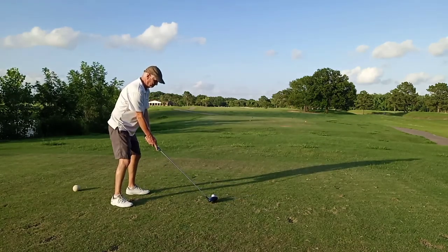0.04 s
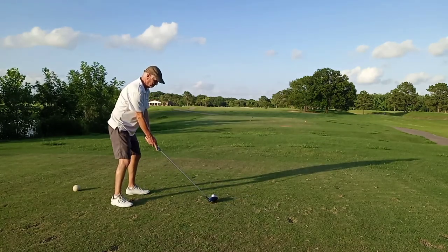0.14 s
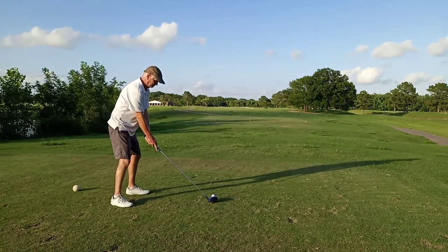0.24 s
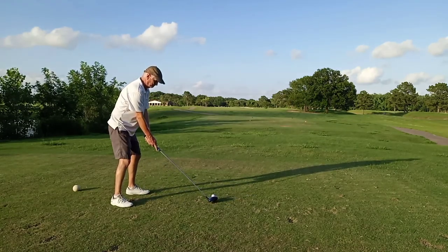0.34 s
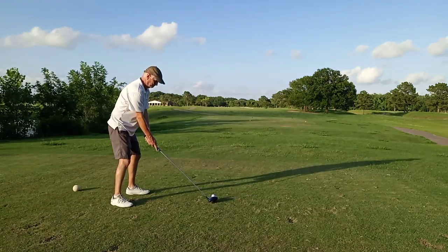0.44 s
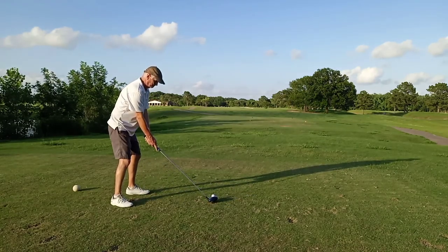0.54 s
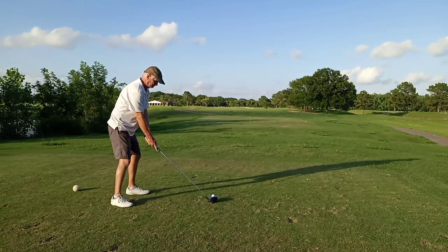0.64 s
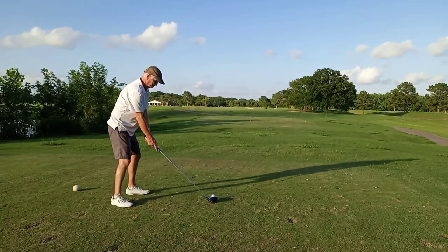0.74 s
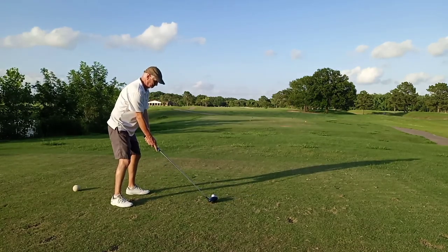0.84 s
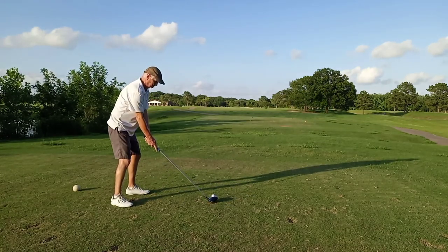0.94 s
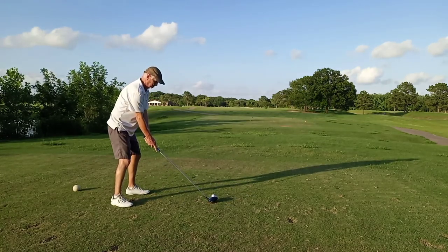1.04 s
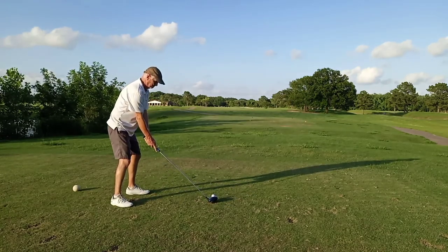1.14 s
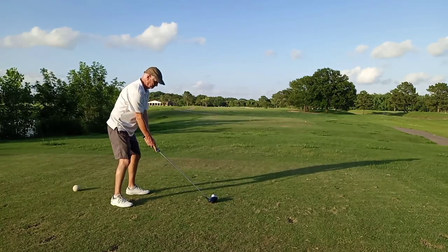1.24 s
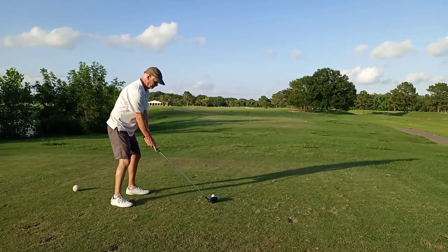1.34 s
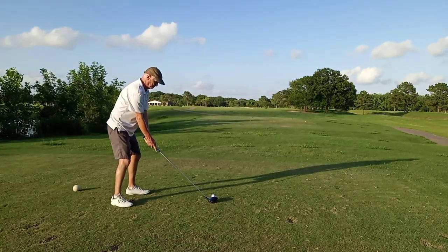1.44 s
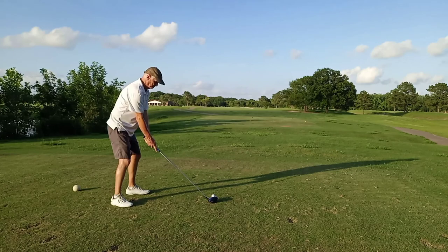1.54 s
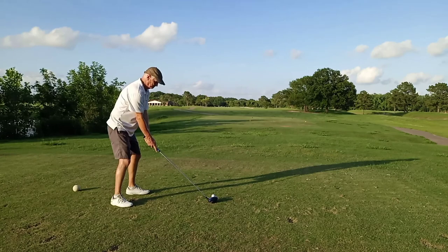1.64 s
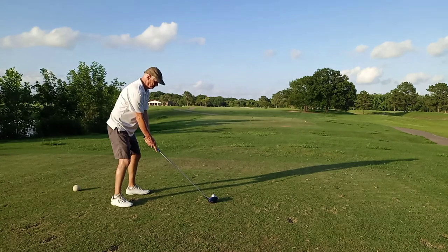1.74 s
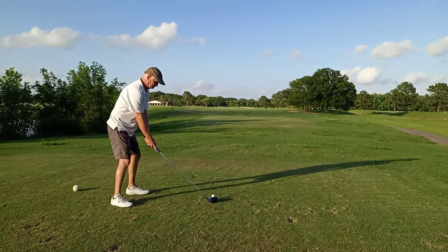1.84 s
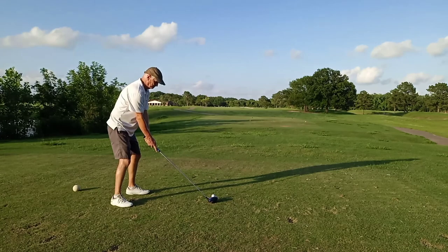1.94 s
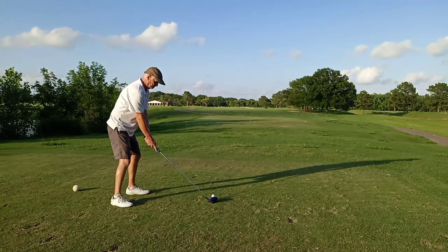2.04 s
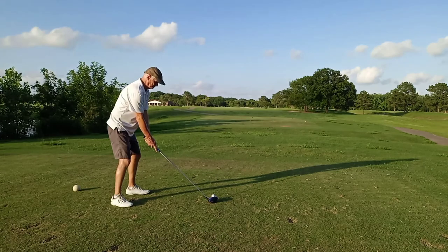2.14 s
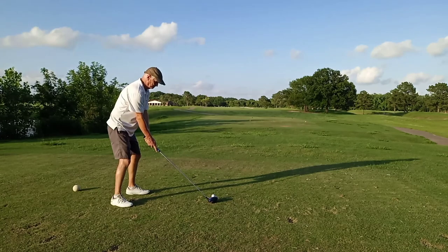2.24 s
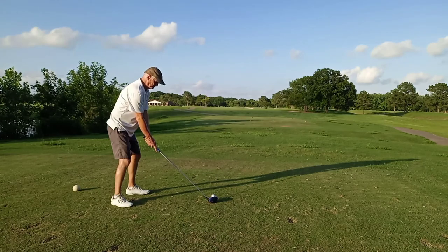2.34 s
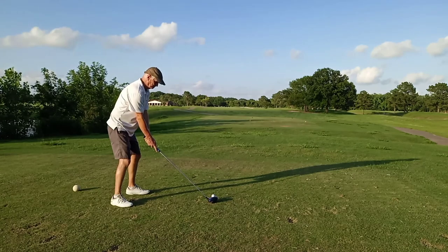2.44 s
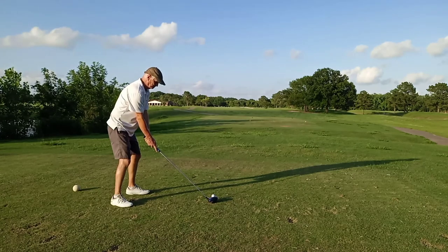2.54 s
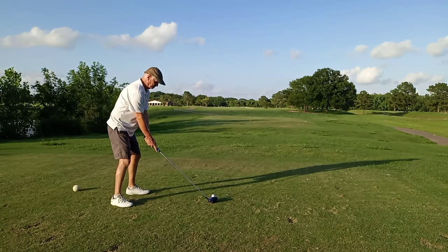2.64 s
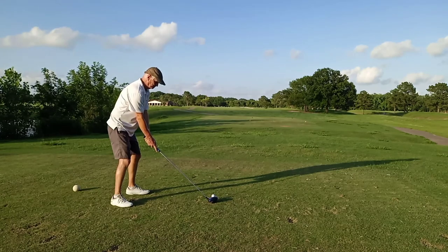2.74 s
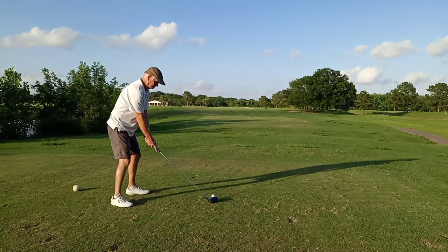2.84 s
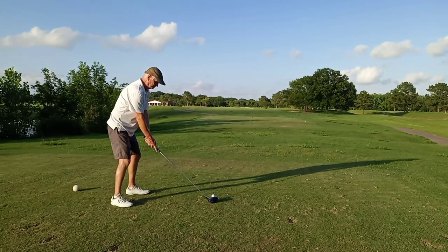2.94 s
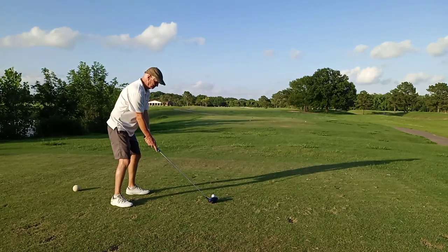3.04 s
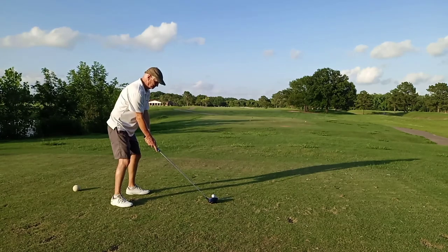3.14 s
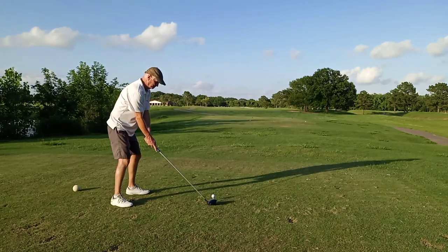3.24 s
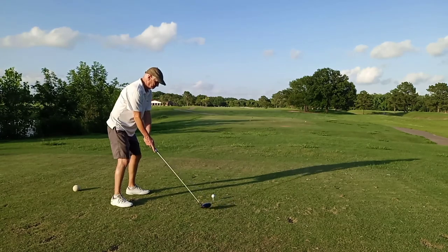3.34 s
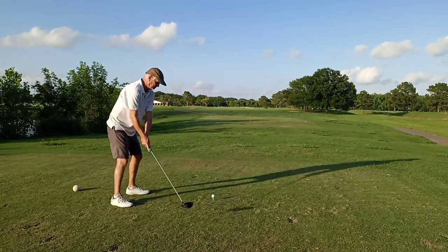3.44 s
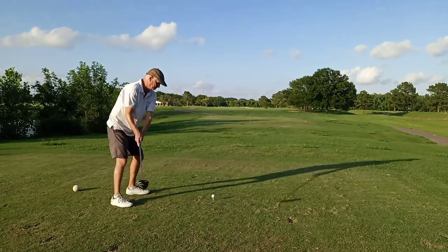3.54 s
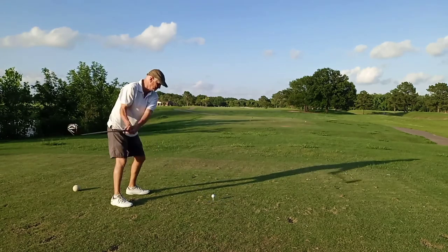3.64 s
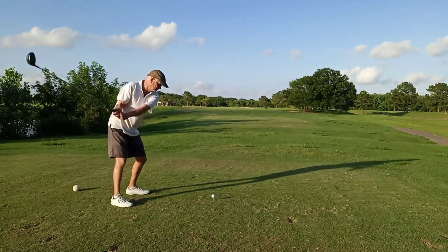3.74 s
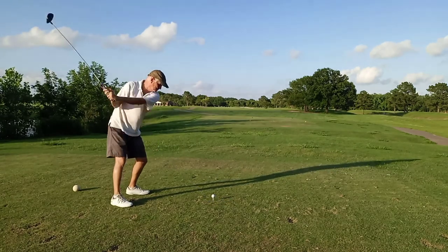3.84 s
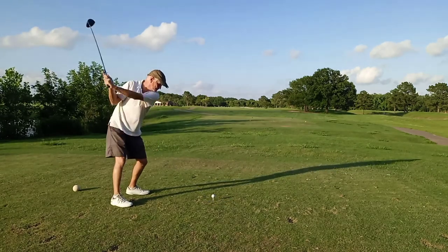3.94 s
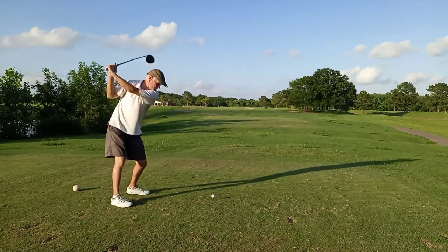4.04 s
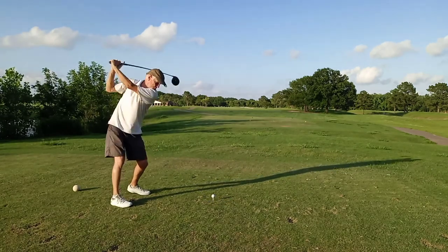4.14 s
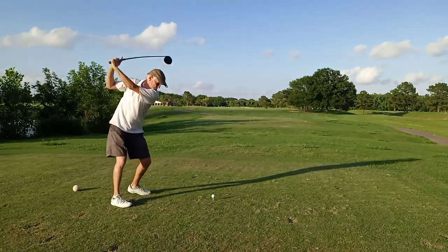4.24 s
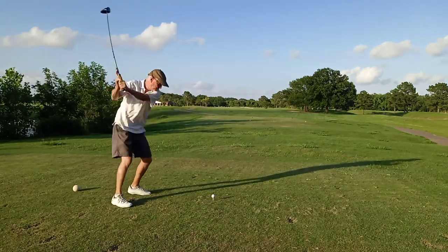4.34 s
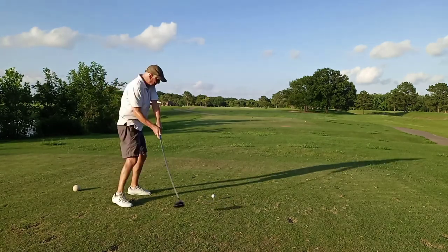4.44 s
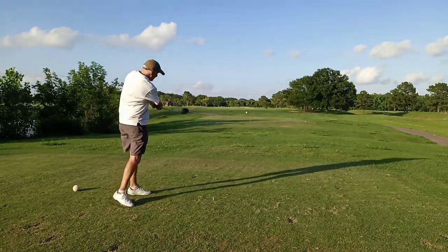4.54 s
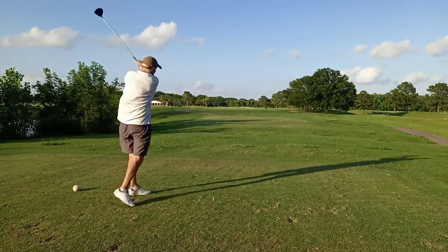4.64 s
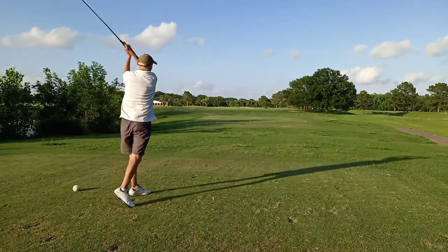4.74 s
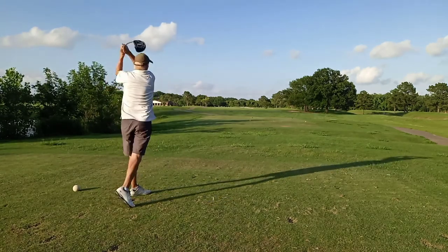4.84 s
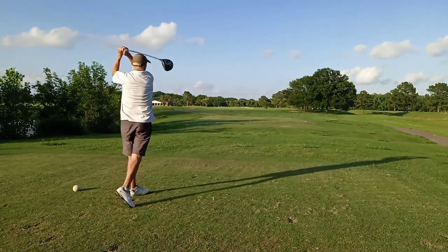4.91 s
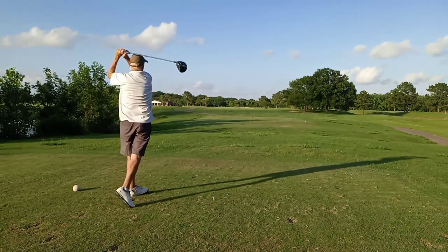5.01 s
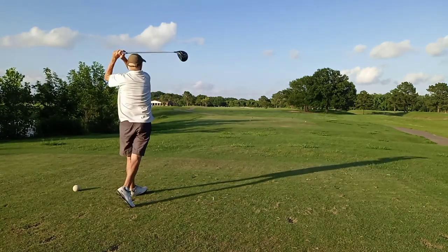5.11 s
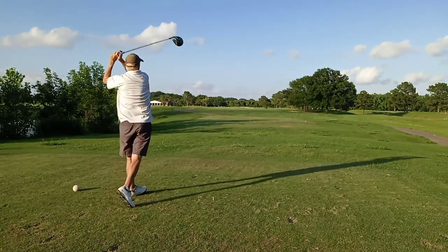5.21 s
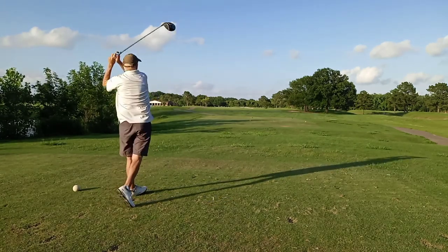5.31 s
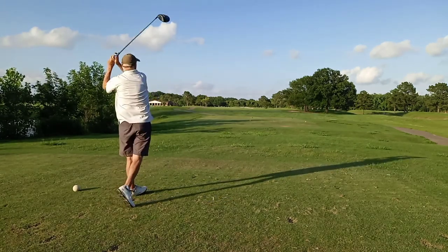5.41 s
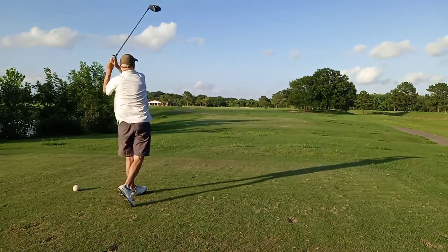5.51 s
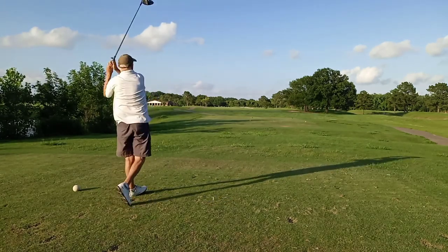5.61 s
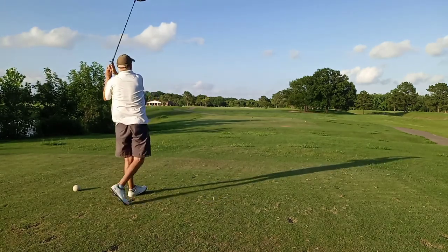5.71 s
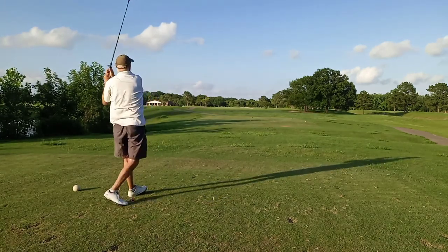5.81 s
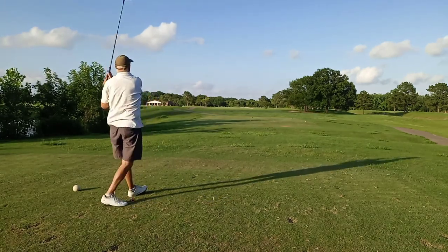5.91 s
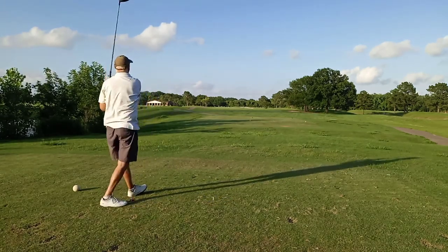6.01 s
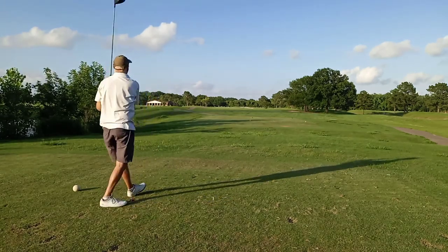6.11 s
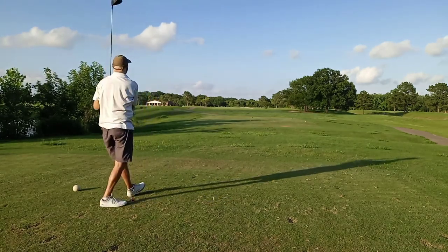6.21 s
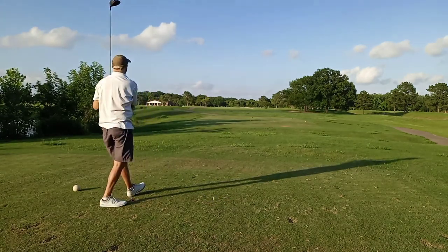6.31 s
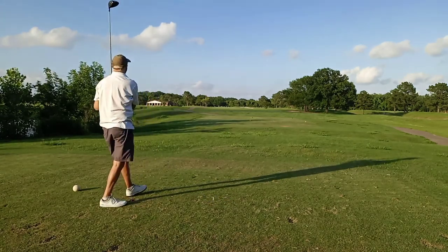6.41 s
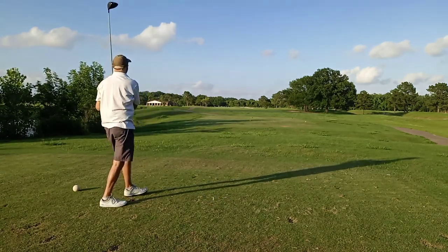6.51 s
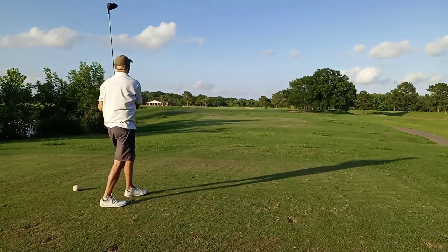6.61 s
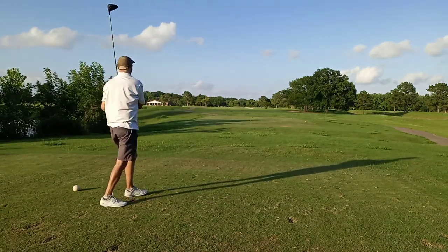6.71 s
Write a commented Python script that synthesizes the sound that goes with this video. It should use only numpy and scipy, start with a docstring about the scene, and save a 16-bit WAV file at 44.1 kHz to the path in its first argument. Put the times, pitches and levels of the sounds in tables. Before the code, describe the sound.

On an open golf course, a wren repeats a quick chirping phrase over a buzzing cicada and a low rumble of distant engines. The bird pauses. Then a nearby club swishes and strikes the ball with a loud, sharp metallic crack that echoes briefly off trees. The wren starts again, with a fainter bird behind it, and the golfer's shoes and clothes brush softly.

```python
"""A golf drive off an open tee: the shaft sheds eddies and swishes, the hollow metal head cracks and
rings, and a stand of trees throws the ring back. Club, tee and shoes tick and brush.
A wren repeats one quick phrase through the leaves, a second bird slurs downward, a third chips.
A cicada buzzes with its clicking ribs, a katydid throbs, and far engines rumble under it all."""
import sys
import numpy as np
from scipy import signal
from scipy.fft import rfft, irfft
from scipy.io import wavfile
from scipy.ndimage import uniform_filter1d

SR = 44100
rng = np.random.default_rng(int(sys.argv[2]) if len(sys.argv) > 2 else 0)


def store_wav(level_fs):
    """Save 16-bit WAV to argv[1]."""
    pcm = np.round(np.clip(np.atleast_2d(level_fs), -1, 1) * 32767)
    wavfile.write(sys.argv[1], SR, pcm.T.astype(np.int16))


N = 298303
T = np.arange(N) / SR

# pressure pulse spectrum: (frequency [Hz], relative level [dB])
BLOW_SPECTRUM = [(20, -33), (50, -11), (90, .5), (250, 2.5), (550, 0), (800, -5), (1020, -29), (1300, -17),
                 (1550, -22), (1900, -12.5), (2600, -21), (4000, -20.5), (6000, -17), (8000, -26.5)]
# club head modes: (frequency [Hz], relative level [dB], t60 [s])
HEAD_MODES = [(3428, -2, .115), (3640, -19, .07), (4388, -9, .075), (4603, -18, .1), (5150, -8, .11),
              (5205, 0, .17), (5385, -15, .09), (5510, -13, .13), (5600, -10, .05), (5985, -12, .12),
              (6260, -17, .16), (6712, -14, .08), (6940, -16, .07), (7250, -12, .08), (7520, -22, .09)]
# light touch on metal: (frequency [Hz], level [dB], t60 [s])
CLINK_MODES = [(4820, -64, .1), (5517, -66, .1), (7265, -65, .14)]
# club, tee, shoes: (time [s], level [dB], centre [Hz], width [Hz], t60 [s])
HANDLING_TICKS = [(3.389, -64, 6500, 3500, 0.045), (4.035, -70, 5000, 4000, 0.026),
                  (4.611, -47, 2000, 1300, 0.019), (5.2347, -55.5, 5600, 2500, 0.02),
                  (5.597, -57, 2500, 3500, 0.065), (5.623, -63, 2500, 3500, 0.057)]
# shoes, clothes: (time [s], length [s], level [dB], centre [Hz], width [Hz])
HANDLING_SCUFFS = [(2.79, .15, -81, 6700, 1400), (5.55, .13, -70, 860, 2500), (5.58, .1, -72, 6100, 1500),
                   (6.43, .17, -68, 695, 1000), (6.43, .19, -74, 6700, 1400)]
# wren phrases: (start [s], span to last syllable [s], level [dB], top pitch [Hz])
WREN_PHRASES = [(-.028, .192, -49, 5150), (.238, 0.17, -47, 4820), (0.484, 0.18, -45, 5140),
                (.734, 0.19, -44.5, 5380), (1.005, 0.18, -45, 4590), (1.271, 0.18, -46.5, 5000),
                (1.544, .19, -46.5, 5020), (4.628, .195, -54.5, 4940), (4.892, .196, -49, 4690),
                (5.157, .19, -46.5, 4627), (5.417, .182, -46, 4920), (5.667, .19, -46, 5090),
                (5.928, 0.2, -45.5, 4230), (6.196, 0.19, -47, 5084), (6.46, .19, -47.5, 4985)]
# rise, hold, flick, plunge, low rise, fall: (place in span [0-1], length [s], start pitch [Hz],
# turn pitch [Hz], end pitch [Hz], place of turn [0-1], top pitch tracking [0-1], relative level [dB])
WREN_SYLLABLES = [(0, 0.0302, 2655, 3149, 3344, .42, .05, 2.5),
                  (0.354, 0.039, 4007, 4142, 4244, .35, .35, -5.5),
                  (0.524, 0.019, 4180, 5127, 4710, 0.8, .95, -9),
                  (0.624, .021, 4484, 3438, 2903, 0.4, .15, -1.5),
                  (.742, .036, 2165, 2483, 2592, .45, .05, -3.5),
                  (.995, .03, 2950, 2872, 2585, 0.4, .05, -0.5)]
# second bird: (time [s], top pitch [Hz], relative level [dB], length [s])
BIRD_SLURS = [(0.229, 2047, -66.5, 0.08), (4.162, 2360, -75.5, 0.25), (4.869, 2455, -65, 0.2),
              (5.344, 2250, -65, 0.096), (5.747, 2175, -65, 0.11), (6.164, 2144, -66, 0.12),
              (6.58, 2185, -64, 0.11)]
# third bird: (time [s], pitch [Hz], relative level [dB])
BIRD_CHIPS = [(.925, 7410, -71), (4.24, 7160, -69)]
# cicada band: (frequency [Hz], relative level [dB])
CICADA_SPECTRUM = [(2300, -42), (2650, -23.5), (2950, -2.5), (3250, 0), (3600, -4), (3900, -19),
                   (4500, -48.5)]
# cicada effort: (time [s], level [dB], click rate [Hz])
CICADA_CURVE = [(0, -58.5, 205), (1, -62.5, 208), (2.2, -60.5, 213), (3, -66, 205), (3.45, -63.5, 199),
                (3.8, -72.5, 207), (4.2, -76.5, 205), (4.6, -68.5, 203), (6.76, -62, 205)]
# far engines: (frequency [Hz], relative level [dB])
RUMBLE_SPECTRUM = [(20, -32.5), (38, -20.5), (52, -12.5), (66, 1), (85, -2), (120, 2), (160, -4.5),
                   (200, -8), (250, -16), (330, -19.5), (450, -33.5), (700, -64)]
# rumble loudness: (time [s], level [dB])
RUMBLE_CURVE = [(0, -52), (.8, -55), (1.25, -52.5), (2.8, -56), (3.05, -52), (4.3, -54), (5.05, -51),
                (5.95, -50.5), (6.76, -52.5)]
# wash of air: (frequency [Hz], relative level [dB])
AIR_SPECTRUM = [(200, -17), (400, -6.5), (650, 2), (860, 0.5), (1100, -4), (1550, -6), (1900, -12),
                (2600, -12.5), (4200, -15.5), (5500, -18), (7300, -19.5), (8200, -40.5)]

IMPACT_S = 4.569
WREN_TOP_HZ = 5043


def drive():
    """Club hits ball. The head rushes at the trees ahead, so their echo is pitched above the side's."""
    t = np.arange(SR // 2) / SR
    direct, ahead, aside = np.zeros((3, N))
    contact = gain_of(-19.5 - 60 * t / .0069) * band(2900, 4500, len(t))
    doppler = 1 + np.clip((t - .018) * .92, 0, .07)  # head swings toward the listener
    add(direct, IMPACT_S, contact)
    add(direct, IMPACT_S + .0005, blow())
    add(direct, IMPACT_S, head_ring(doppler))
    crack = noise([(500, -7.5), (1600, -5.5), (2900, -11), (4600, 4.5), (6500, 7.5), (8300, -22)], len(t))
    crack *= gain_of(-5 - 60 * t / .029)
    add(ahead, IMPACT_S, spread_ring(1.05, 1.1, len(t)) + crack)
    add(aside, IMPACT_S, spread_ring(1, 1.08, len(t)) + crack)
    return direct + gain_of(-19.5) * tree_echo(ahead, aside)


def blow(size=4096, peak_db=-2):
    """Ball squashed and released: one minimum-phase pressure pulse."""
    log_gain = np.log(gain_at(BLOW_SPECTRUM, abs(np.fft.fftfreq(size, 1 / SR))))
    pulse = np.fft.ifft(np.exp(np.conj(signal.hilbert(log_gain)))).real
    return -gain_of(peak_db) * pulse / abs(pulse).max()


def head_ring(doppler):
    """Hollow head: Doppler-shifted main modes plus a dense clatter of short ones."""
    t = np.arange(len(doppler)) / SR
    warped_s = np.cumsum(doppler) / SR
    modes = sum(gain_of(db - 60 * t / t60_s) * np.sin(2 * np.pi * (hz * warped_s + rng.random()))
                for hz, db, t60_s in HEAD_MODES)
    clatter = noise([(1000, -29), (2400, -19), (4500, -2), (5700, 3.5), (7300, 3.5), (8300, -20)], len(t))
    clatter *= gain_of(-60 * t / .085)
    attack = 1 - np.exp(-t / .0005)
    return (gain_of(-22.5) * modes + gain_of(-27) * clatter) * attack


def spread_ring(low, high, size):
    """Ring sent over a fan of directions, each with its own Doppler factor."""
    return sum(head_ring(np.full(size, doppler)) for doppler in np.linspace(low, high, 12))


def tree_echo(ahead, aside, tree_line_s=.14, depth_s=.1):
    """Echo builds to the tree line, holds through the stand, dies. Side trees answer later."""
    delay_s = np.arange(SR) / SR
    beyond_s = delay_s - tree_line_s
    rise_db = 203.5 * np.minimum(beyond_s, 0)
    sag_db = 31 * np.clip(beyond_s, 0, depth_s)
    fall_db = 100 * np.maximum(beyond_s - depth_s, 0)
    returns = gain_of(rise_db - sag_db - fall_db)
    side_share = np.clip(delay_s / .28, 0, 1)
    return scatter(ahead, returns * (1 - side_share)) + gain_of(-5) * scatter(aside, returns * side_share)


def swish(fastest_s=4.54, width_s=.098, top_hz=785, lock_s=4.504, end_s=4.551):
    """Shaft eddies rise with speed, lock into a louder tone, die at the ball. Head hisses near top speed."""
    speed_octaves = -((T - fastest_s) / width_s) ** 2 / np.log(2)
    hz = top_hz * 2 ** speed_octaves
    unlocked_db = 8 * np.clip((lock_s - T) / .004, 0, 1)
    late_s = np.maximum(T - end_s, 0)
    fade_db = 12 * np.minimum(late_s / .008, 1) + 300 * late_s
    db = -35.5 + 13 * speed_octaves - unlocked_db - fade_db
    phase = phase_of(hz * (1 + .08 * band(0, 160)))
    eddies = unit_rms((1.2 + band(0, 190)) * np.sin(phase) + band(0, 190) * np.cos(phase))
    wake = noise([(100, -10), (350, 4.5), (900, .5), (1300, -2), (2200, -8.5), (4000, -20.5), (8200, -39)])
    hiss = noise([(1500, -18), (3500, -5.5), (5800, 3), (7200, 0), (8200, -20)])
    hiss *= np.clip((db + 59.5) / 6, 0, 1)
    return gain_of(db) * (gain_of(-1.5) * eddies + gain_of(-9.5) * wake + gain_of(-14.5) * hiss)


def handling():
    """Dry ticks of club, tee and shoes; soft brushes of shoes and clothes."""
    out, t = np.zeros(N), np.arange(SR // 4) / SR
    for time_s, db, hz, width_hz, t60_s in HANDLING_TICKS:
        add(out, time_s, gain_of(db - 60 * t / t60_s) * band(hz, width_hz, len(t)))
    for time_s, length_s, db, hz, width_hz in HANDLING_SCUFFS:
        size = round(length_s * SR)
        envelope = gain_of(db + 1.5 * band(0, 120, size)) * signal.windows.tukey(size, .6)
        add(out, time_s, envelope * band(hz, width_hz, size))
    return out


def clink(time_s=3.387):
    """Light touch on metal as the club is taken back."""
    out, t = np.zeros(N), np.arange(SR // 2) / SR
    for hz, db, t60_s in CLINK_MODES:
        add(out, time_s, gain_of(db - 60 * t / t60_s) * np.sin(2 * np.pi * hz * t))
    return out


def wren():
    """One phrase, repeated. Leaves scatter high pitches more."""
    direct, scattered = np.zeros((2, N))
    for start_s, span_s, phrase_db, top_hz in WREN_PHRASES:
        for place, length_s, start_hz, turn_hz, end_hz, turn, tracking, db in WREN_SYLLABLES:
            time_s = start_s + place * span_s
            shift = (top_hz / WREN_TOP_HZ) ** tracking
            hz, note = syllable(length_s, start_hz * shift, turn_hz * shift, end_hz * shift, turn)
            leaves_db = 5.5 + 16 * np.log2(hz / WREN_TOP_HZ)
            if time_s >= 0:
                add(direct, time_s, gain_of(phrase_db + db) * note)
                add(scattered, time_s, gain_of(phrase_db + db + leaves_db) * note)
    return direct + foliage(scattered, t60_s=.35)


def syllable(length_s, start_hz, turn_hz, end_hz, turn):
    """Pitch runs to a rounded turn, then eases out. High notes get more random tilt."""
    u = np.linspace(0, 1, round(length_s * SR), endpoint=False)
    run_hz = start_hz + (turn_hz - start_hz) * u / turn
    ease_hz = end_hz + (turn_hz - end_hz) * ((1 - u) / (1 - turn)) ** 1.6
    hz = uniform_filter1d(np.where(u < turn, run_hz, ease_hz), round(.004 * SR))
    tilt = .025 * (turn_hz / WREN_TOP_HZ) ** 2 * rng.uniform(-1.01, 1)
    hz *= 1 + tilt * (2 * u - 1)
    swell = np.sin(np.pi * u ** 1.246) ** .95
    return hz, whistle(hz, swell)


def whistle(hz, envelope, waver_hz=29.5, flutter_hz=70, flutter_db=2.25):
    """Pure bird tone, unsteady in pitch and level."""
    t = np.arange(len(hz)) / SR
    waver = 1 + .011 * np.sin(2 * np.pi * (waver_hz * t + rng.random()))
    flutter = gain_of(flutter_db * np.sin(2 * np.pi * (flutter_hz * t + rng.random())))
    return envelope * flutter * np.sin(phase_of(hz * waver)) * signal.windows.tukey(len(t), .15)


def far_birds(chip_s=.06, attack_s=.014, t60_s=.22):
    """Thin chips and soft down-slurs through the leaves."""
    out, t = np.zeros(N), np.arange(0, chip_s, 1 / SR)
    chip_envelope = np.minimum(t / attack_s, 1) * gain_of(-60 * np.maximum(t - attack_s, 0) / t60_s)
    for time_s, hz, db in BIRD_CHIPS:
        add(out, time_s, whistle(np.full(len(t), hz), gain_of(db) * chip_envelope))
    for time_s, top_hz, db, length_s in BIRD_SLURS:
        u = np.arange(0, length_s, 1 / SR) / length_s
        hz = top_hz * (1 - .24 * u ** .76)
        envelope = gain_of(db - 5.8 * u) * signal.windows.tukey(len(u), .35)
        add(out, time_s, envelope * np.sin(phase_of(hz)))
    return gain_of(1.5) * out + gain_of(-8.5) * foliage(out, t60_s=.25)


def foliage(call, t60_s, far_t60_s=1.3):
    """Near leaves and trunks smear a call; far trees add a faint long tail."""
    t = np.arange(SR) / SR
    onset = 1 - np.exp(-t / .0037)
    return scatter(call, onset * (gain_of(-60 * t / t60_s) + gain_of(-12 - 60 * t / far_t60_s)))


def cicada():
    """Fast rib clicks make a stack of wavering harmonics; other cicadas blur into a band behind."""
    db, click_hz = follow(CICADA_CURVE)
    phase = phase_of(click_hz * (1 + .01184 * band(0, 61.3)))
    near = sum(gain_at(CICADA_SPECTRUM, k * click_hz.mean()) * np.cos(k * phase + 2 * np.pi * rng.random())
               for k in range(12, 21))
    chorus = gain_of(-1.5) * noise(CICADA_SPECTRUM)
    return gain_of(db) * unit_rms(unit_rms(near) + chorus)


def katydid(first_s=1.45, period_s=1.93, width_s=.4):
    """High buzz: uneven throb, evenly paced swells."""
    buzz = band(6380, 460) + .52 * band(6540, 70)
    throb = gain_of(1.7 * band(9.1, 7.6))
    from_peak_s = (T - first_s + period_s / 2) % period_s - period_s / 2
    swell = np.exp(-(from_peak_s / width_s) ** 2)
    return unit_rms(buzz * throb) * gain_of(-85 + 8 * swell)


def rumble():
    """Uneven low noise of far engines."""
    db, = follow(RUMBLE_CURVE)
    return unit_rms(noise(RUMBLE_SPECTRUM) * gain_of(.9 * band(0, 18))) * gain_of(db)


def air_and_road(passing_s=5.15, width_s=.42):
    """Wash of air and murmur of a far road; both swell once as traffic passes."""
    passing_db = 3 * np.exp(-((T - passing_s) / width_s) ** 2)
    air = noise(AIR_SPECTRUM) * gain_of(-73.5 + 1.3 * band(0, 14))
    road = unit_rms(band(865, 130) * gain_of(4 * band(0, 6))) * gain_of(-76)
    return (air + road) * gain_of(passing_db)


def engine(throttle_s=4.8, width_s=.37, idle_hz=63.6, working_hz=66.66):
    """One far engine opens up: firing rate rises, the fifth harmonic emerges."""
    throttle = 1 / (1 + np.exp((throttle_s - T) / width_s))
    firing_hz = idle_hz + (working_hz - idle_hz) * throttle
    phase = phase_of(firing_hz * (1 + .011 * band(0, 30)))
    drone = gain_of(-59.5 + .5 * throttle) * (np.sin(2 * phase) + .49 * np.sin(phase))
    fifth = gain_of(-86 + 22.5 * throttle) * np.sin(5 * phase)
    return (drone + fifth) * gain_of(4.1 * band(0, 25))


def gain_of(db):
    """Decibels to amplitude."""
    return 10 ** (np.asarray(db) / 20)


def unit_rms(x):
    """Scale to rms 1."""
    return x / np.sqrt(np.mean(x ** 2) + 1e-20)


def phase_of(hz):
    """Running phase [rad]."""
    return 2 * np.pi * np.cumsum(hz) / SR


def follow(curve):
    """Each value column of a curve, per sample."""
    time_s, *columns = np.transpose(curve)
    return [np.interp(T, time_s, column) for column in columns]


def gain_at(spectrum, hz):
    """Spectrum gain, interpolated in log frequency."""
    points_hz, db = np.transpose(spectrum)
    return gain_of(np.interp(np.log(hz + 1), np.log(points_hz + 1), db))


def add(mix, time_s, sound):
    """Mix a sound in at time_s."""
    part = mix[round(time_s * SR):][:len(sound)]
    part += sound[:len(part)]


def noise(spectrum, size=N):
    """Shaped noise, rms 1."""
    shape = gain_at(spectrum, np.fft.rfftfreq(size, 1 / SR))
    return unit_rms(irfft(rfft(rng.standard_normal(size)) * shape, size))


def band(hz, width_hz, size=N):
    """Bell-shaped noise band, rms 1; at 0 Hz, a random wobble."""
    bell = np.exp(-2 * ((np.fft.rfftfreq(size, 1 / SR) - hz) / width_hz) ** 2)
    return unit_rms(irfft(rfft(rng.standard_normal(size)) * bell, size))


def scatter(x, envelope):
    """Many small reflections under an envelope."""
    taps = rng.standard_normal(len(envelope)) * envelope
    return signal.oaconvolve(x, taps / np.linalg.norm(taps))[:N]


def scene():
    """All sources, mono."""
    background = rumble() + air_and_road() + engine() + cicada() + katydid()
    birds = wren() + far_birds()
    golfer = swish() + drive() + handling() + clink()
    return (golfer + birds + background)[None]


def record(dry, cutoff_hz=8250):
    """Steep low-pass."""
    taps = signal.firwin(201, cutoff_hz, window=("kaiser", 8), fs=SR)
    return signal.oaconvolve(dry, taps[None], "same")


dry = scene()
out = record(dry)
store_wav(out)
```